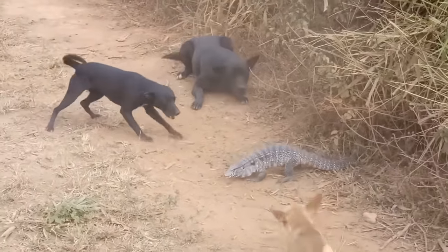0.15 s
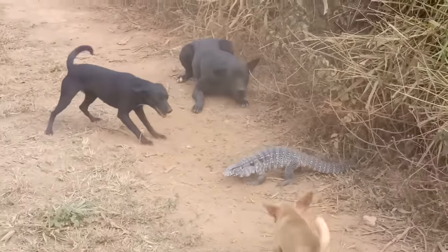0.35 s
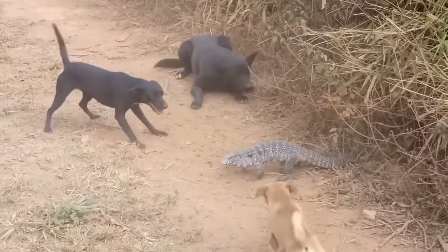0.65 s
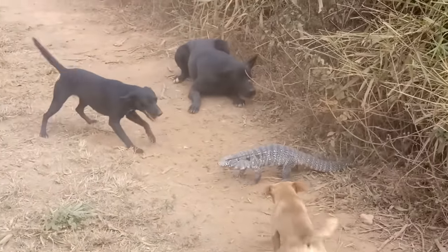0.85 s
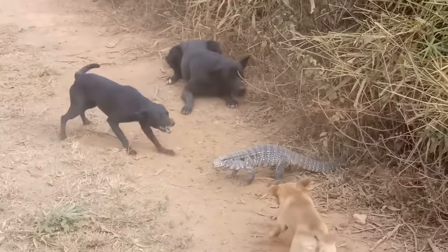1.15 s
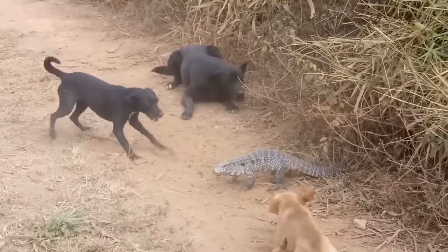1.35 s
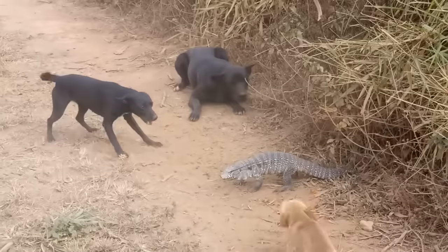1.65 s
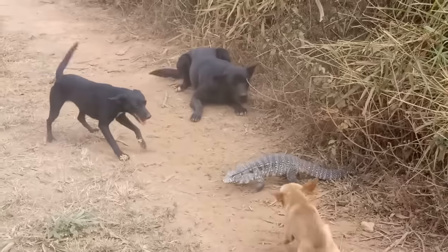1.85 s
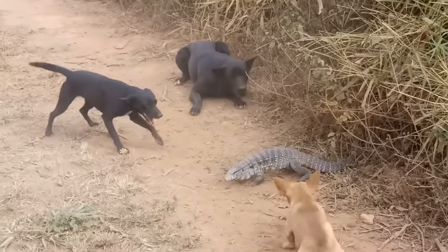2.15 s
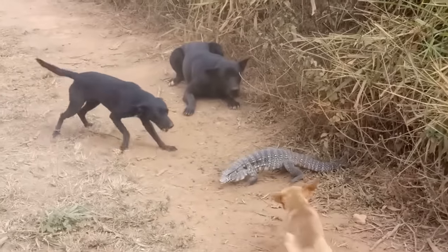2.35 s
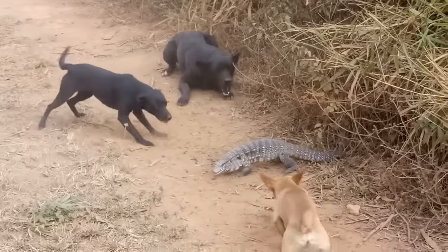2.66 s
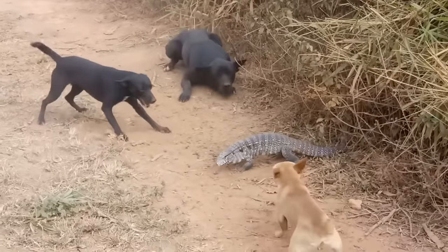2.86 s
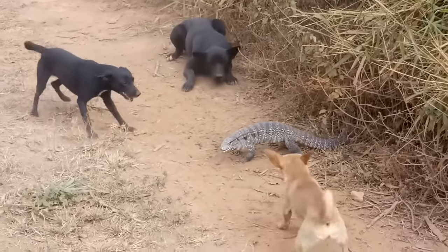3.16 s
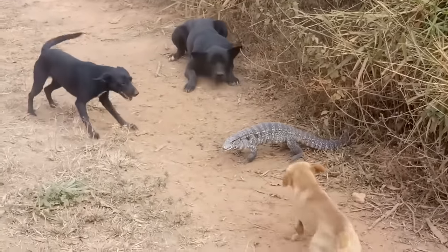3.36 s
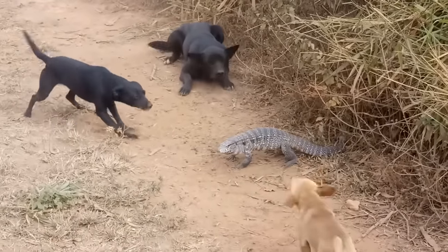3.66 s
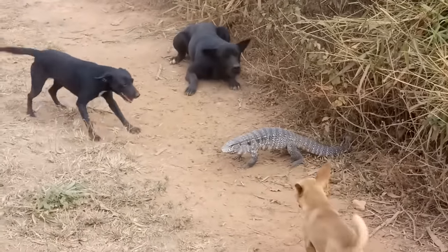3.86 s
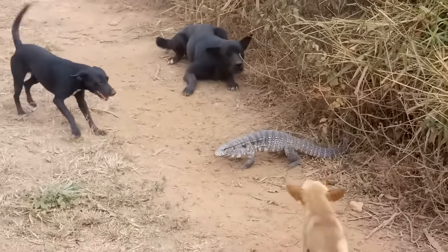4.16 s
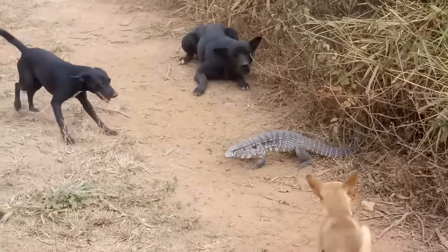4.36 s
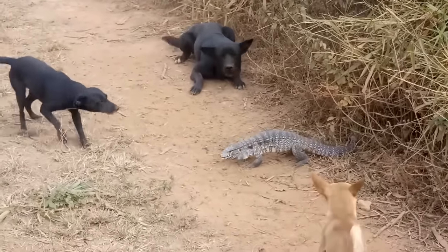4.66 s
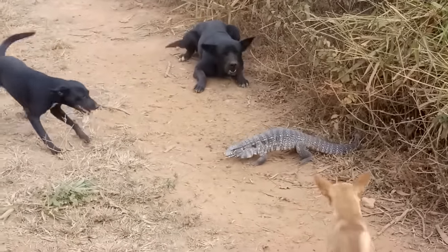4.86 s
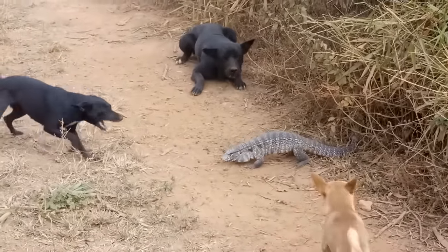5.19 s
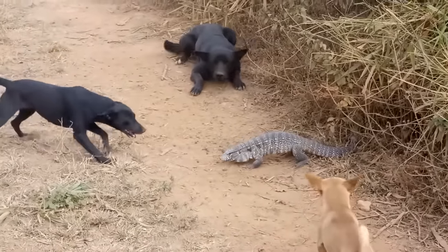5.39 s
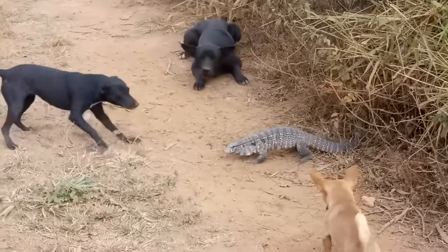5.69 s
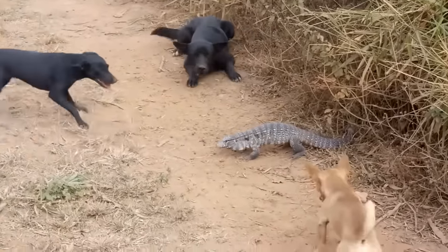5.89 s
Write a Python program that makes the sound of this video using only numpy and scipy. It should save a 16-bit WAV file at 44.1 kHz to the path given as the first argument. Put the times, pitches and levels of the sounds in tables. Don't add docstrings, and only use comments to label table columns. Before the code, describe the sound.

Outdoors on a dry track, a pack of small dogs barks close to a phone for about six seconds, starting at full excitement. Shrill yaps, each a tenth or two of a second, scoop upward and fall sharply, overlapping a mellower dog and hoarse, raspy barks several times a second. Piercing yaps stand out near 0.6, 1.7, 4.5 and 5.8 s; lower barks come around 1.2, 2.3, 4.1, 4.7 and 5.7 s. Low wind buffets lightly at 1.5 and 2 s. A moan climbs from 2.5 to 2.8 s, a short whine swells at 3 s, and a clearer whine rises and falls from 5.1 to 5.5 s. Tiny clicks follow, then low handling thumps at 5.9-6 s. Faint grass rustle and a short brushy echo sit behind, dipping under loud yaps.

```python
import sys
import numpy as np
from scipy import signal
from scipy.fft import rfft, irfft, next_fast_len
from scipy.io import wavfile
from scipy.ndimage import uniform_filter1d, minimum_filter1d, map_coordinates

SR = 44100
rng = np.random.default_rng(int(sys.argv[2]) if len(sys.argv) > 2 else 0)


def log_audio(samples):
    frames = np.atleast_2d(samples).T
    limited = np.clip(frames, -1, 1)
    pcm = np.round(limited * 32767).astype(np.int16)
    wavfile.write(sys.argv[1], SR, pcm)


def invert_db(x):
    u = np.asarray(x, float) / 20
    return 10 ** u


N = 265923

# (start [s], end [s], level [dB], mouth resonance [Hz])
HOARSE_BARKS = [(0.067, 0.151, -15, 1072), (0.237, 0.3, -20.5, 1418), (0.46, 0.595, -34, 673),
                (0.729, 0.83, -25, 836), (0.884, 0.953, -21.5, 1913), (1.11, 1.171, -14, 1380),
                (1.232, 1.309, -18.5, 1245), (1.301, 1.368, -22.5, 999), (1.456, 1.509, -21.5, 1779),
                (1.589, 1.731, -19, 1413), (1.879, 1.945, -21, 1400), (2.066, 2.112, -19.5, 1958),
                (2.218, 2.351, -19.5, 1430), (2.61, 2.731, -13.5, 1271), (2.736, 2.806, -19.5, 1917),
                (2.954, 3.038, -24, 1522), (3.095, 3.119, -13, 1216), (3.291, 3.355, -15.5, 1650),
                (3.433, 3.534, -28.5, 824), (3.654, 3.749, -13.5, 1602), (3.83, 3.869, -20, 1914),
                (4.029, 4.144, -18.5, 1587), (4.208, 4.271, -16, 1893), (4.384, 4.416, -18, 1985),
                (4.649, 4.754, -19, 1404), (4.91, 4.957, -15, 1982), (4.982, 5.065, -19.5, 2130),
                (5.263, 5.356, -15, 1697), (5.447, 5.486, -20, 1783), (5.655, 5.769, -18, 1390)]


def unit(x):
    return x / np.sqrt(np.mean(x ** 2) + 1e-20)


def along(points, hz):
    f, v = np.transpose(points)
    return np.interp(np.log(hz + 1), np.log(f + 1), v)


def wobble(n, rate):
    knots = rng.standard_normal(int(n * rate / SR) + 4)
    return map_coordinates(knots, [np.arange(n) * rate / SR])


def filtered(x, response):
    m = next_fast_len(len(x) + 4096)
    return irfft(rfft(x, m) * response(np.fft.rfftfreq(m, 1 / SR)), m)[:len(x)]


def smooth(x, seconds):
    return uniform_filter1d(x, max(1, int(seconds * SR)), mode="nearest")


def fade(n, seconds):
    k = np.arange(n)
    return np.clip(np.minimum(k, n - k) / (seconds * SR), 0, 1)


def patchy(x, depth_db):
    z = signal.stft(x, nperseg=256)[2]
    field = uniform_filter1d(rng.standard_normal(z.shape), size=3, axis=0)
    field = uniform_filter1d(field, size=5, axis=1)
    return signal.istft(z * invert_db(depth_db * unit(field)), nperseg=256)[1][:N]


def arch(top_s, rise_s, fall_s, top_hz, db, scoop, drop, bend):
    scoop_bend, climb = 3, .15
    swell_db, swell_bend = 14.5, 2.44
    shut_db, shut_bend = 34, 2.09
    s = np.linspace(max(top_s - rise_s, 0), top_s + fall_s, num=32)
    up = np.clip((top_s - s) / rise_s, 0, 1)
    down = np.clip((s - top_s) / fall_s, 0, 1)
    octaves = scoop * (climb * up + (1 - climb) * up ** scoop_bend) + drop * down ** bend
    level_db = db - swell_db * scoop * up ** swell_bend - shut_db * down ** shut_bend
    return np.transpose([s, top_hz / 2 ** octaves, level_db])


def calls():
    # (top [s], rise [s], fall [s], top pitch [Hz], level [dB])
    shrill = [(0.02, .06, 0.055, 2126, -9), (0.415, 0.099, .045, 1815, -9), (0.99, .085, 0.063, 1829, -9.5),
              (1.554, .09, 0.036, 1796, -9.5), (2.722, 0.069, 0.014, 2176, -15),
              (3.39, 0.092, .03, 1912, -10.5), (4.275, .065, 0.059, 1715, -10),
              (5.545, .09, 0.046, 1850, -8.5)]
    jumped = [(1.157, .03, .075, 1530, -9.5), (2.14, 0.03, 0.014, 2221, -9),
              (2.16, .012, 0.041, 1761, -11.5), (2.27, .024, .04, 2128, -9), (2.3, .03, 0.065, 1478, -13),
              (2.755, .028, .045, 1817, -8), (2.849, .012, .055, 1502, -12), (3.04, .022, .045, 2129, -10),
              (3.375, .02, .07, 1571, -20.5), (3.735, .015, .07, 1550, -13.5), (3.91, .015, .115, 1611, -9),
              (4.15, .01, .03, 2093, -19.5), (5.055, 0.027, .07, 1769, -9), (2.83, .035, .015, 1390, -12),
              (1.234, .02, .05, 1500, -13.5), (.075, .02, 0.046, 1143, -13), (1.22, .035, 0.046, 2300, -19)]
    cracked = [(0.296, .06, .09, 1655, -11.5), (0.65, .065, 0.062, 1552, -10.5),
               (1.741, .04, .055, 1590, -14), (3.074, .13, .045, 1542, -11), (4.475, .095, .02, 1845, -9.5),
               (5.015, .1, .02, 1749, -9), (5.805, .1, .02, 1513, -11.5)]
    mellow = [(0.866, 0.077, 0.083, 1461, -10.5), (1.405, .085, 0.095, 1369, -9.5),
              (1.625, 0.045, 0.021, 1287, -14), (1.832, 0.074, 0.033, 1423, -9.5),
              (1.961, .085, 0.086, 1380, -10.5), (2.104, 0.048, 0.016, 1297, -20.5),
              (2.525, .1, .06, 1369, -10.5), (2.766, 0.057, 0.048, 1340, -11.5),
              (4.14, .025, .02, 1326, -20.5)]
    broken = [(0.042, 0.051, .035, 1412, -15), (2.372, .02, 0.013, 1500, -15),
              (2.42, 0.053, .03, 1450, -11), (.35, .03, .015, 1380, -17), (5.485, .035, 0.016, 1320, -13.5),
              (3.522, 0.023, 0.026, 1320, -16.5), (3.59, .08, 0.054, 1445, -13.5),
              (3.885, 0.066, 0.018, 1350, -13)]
    barks = [(0.09, 0.046, .065, 553, -19.5), (1.24, .06, .055, 774.4, -16),
             (2.285, 0.035, 0.087, 722.4, -17.5), (3.685, 0.062, .025, 785, -24),
             (4.105, .09, .03, 694.6, -14), (4.69, 0.079, .06, 790, -15), (5.7, 0.08, 0.067, 772, -15.5)]
    piercing = [(0.63, .085, .045, 2170, -11.5), (1.675, .075, .04, 2070, -10),
                (4.54, .075, .05, 2120, -11), (5.83, .065, .075, 2235, -14), (2.232, .04, .025, 1695, -13)]
    # (half-pitch partials [dB], brightness [dB per octave],
    # scoop [octaves], drop [octaves], bend of the drop [exponent])
    voices = [
        (-50, 4.5, 1.1, 1, 3.2),
        (-42.5, 4, .08, .9, 2.2),
        (-11.5, 6, 1.2, 0.99, 2.9),
        (-37.5, 1.5, 1.1, 1.7, 3.2),
        (-3.5, 3.5, .6, .6, 3.2),
        (-31, 4.5, .4, .4, 2.5),
        (-31, 9.5, 1.2, 1, 3.2),
    ]
    # (time [s], pitch [Hz], level [dB])
    whines = [
        [(1.58, 318, -31.5), (1.62, 413, -44.5), (1.68, 309.7, -42.5), (1.72, 231, -43.5), (1.77, 362, -44.5)],
        [(2.43, 192.6, -59.5), (2.47, 309.7, -30), (2.5, 356.5, -40.5), (2.6, 330.3, -31.5), (2.65, 372, -24),
         (2.7, 451, -26), (2.76, 634, -27.5), (2.795, 635, -22), (2.84, 379, -23.5)],
        [(2.84, 396.3, -39), (2.9, 393, -24.5), (2.94, 420.5, -19.5), (2.97, 611.4, -10.5), (2.995, 617, -13.5),
         (3.01, 552, -27)],
        [(3.0, 312.5, -32), (3.03, 258.3, -32.5), (3.1, 182.8, -36.5), (3.17, 158.5, -43.5)],
        [(4.862, 1136, -43), (4.88, 690.7, -31.5), (4.905, 554.5, -23.5), (4.96, 679, -29), (5.02, 595, -32.5),
         (5.05, 456, -58), (5.1, 491, -32)],
        [(5.12, 696, -29.5), (5.17, 825, -14.5), (5.225, 978, -11), (5.27, 1062, -9), (5.315, 1219, -18),
         (5.355, 983, -17), (5.42, 829, -16.5), (5.46, 720, -24.5), (5.51, 586, -36)],
    ]
    # (time [s], pitch [Hz], level [dB])
    growl = [(5.128, 227.6, -36.5), (5.2, 201, -43.5), (5.289, 223, -48.5)]
    # (half-pitch partials [dB], brightness [dB per octave])
    whine_voices = [(-20.5, -7), (-23, 4.5), (-32, -9), (-44, 2.5), (-63, -2), (-32.5, 1.5), (-45, -9.5)]
    pack = []
    for rows, voice in zip([shrill, jumped, cracked, mellow, broken, barks, piercing], voices):
        half_db, bright_db, *shape = voice
        pack += [(arch(*row, *shape), half_db, bright_db) for row in rows]
    return pack + [(rows, *voice) for rows, voice in zip(whines + [growl], whine_voices)]


def yaps():
    # (frequency [Hz], gain [dB])
    throat = [(150, -64), (500, -2.5), (900, -0.5), (1600, 11), (2500, -6), (4200, -18.5), (6000, -29.5),
              (7500, -38), (12000, -57)]
    out = np.zeros(N + SR)
    hoarse = np.zeros(N + SR)
    for start_s, end_s, *_ in HOARSE_BARKS:
        hoarse[round(start_s * SR):round(end_s * SR)] = 1
    for rows, half_db, bright_db in calls():
        s, hz, db = np.transpose(rows)
        t = np.arange(s[0], s[-1], 1 / SR)
        start, n = round(s[0] * SR), len(t)
        closed = np.median(hz) < 450
        glide = smooth(np.interp(t, s, hz), .01)
        climb = np.gradient(np.log(glide), t)
        rough = hoarse[start:start + n] * (0 if closed else .45)
        rough = rough + (not closed) * np.clip(climb / 14 - .3, 0, .55)
        pitch = glide * (1 + (.004 + .022 * rough) * wobble(n, 250) + .012 * wobble(n, 45))
        level = smooth(np.interp(t, s, invert_db(db)), .006) * invert_db((.5 + 3 * rough) * wobble(n, 200))

        order = np.arange(1, int(2 * 15000 / hz.max()))[:24, None] / 2
        age, coarse = t[::32] - s[0], pitch[::32]
        partial_hz = order * coarse
        uneven_db = np.array([wobble(len(age), 32 * 55) for _ in order]) * (order > 1)
        uneven_db = (6.5 if n < .2 * SR else 4) * uneven_db
        drop = smooth(np.clip(-np.gradient(np.log(coarse), age), 0, 30), 0.0003)
        tilt_db = (bright_db - 3 * age / age[-1] - .5 * drop) * np.log2(order) - 12 * (order < 1)
        throat_db = along(throat, partial_hz * (2.2 if closed else 1))
        gain = invert_db(throat_db + tilt_db + uneven_db) * (partial_hz < 15500)
        onset = invert_db(-7.0 - 60 * age / 0.023)
        steep = invert_db(-4.5) * (not closed) * np.clip(climb[::32] / 14 - .45, 0, 1)
        gain *= np.where(order % 1, invert_db(half_db) + onset + steep, 1)
        gain /= np.linalg.norm(gain, axis=0)
        smear = np.clip((partial_hz - 4000) / 9000, 0, .45)
        smear = np.clip(smear + .3 * rough[::32], 0, .9)
        flutter = np.array([wobble(len(age), 32 * 450) for _ in order]) * (order > .5)
        gain *= np.sqrt(1 - smear ** 2) + smear * flutter
        gain = uniform_filter1d(np.repeat(gain, 32, axis=1), size=48, axis=1)[:, :n]

        phase = 2 * np.pi * (np.cumsum(pitch) / SR * order + rng.random(order.shape))
        voice = np.sum(gain * np.sin(phase), axis=0)
        out[start:start + n] += np.sqrt(2) * level * fade(n, .008) * voice
    return out[:N]


def wind():
    # (time [s], level [dB])
    buffet = [(0.0, -68), (0.54, -51.5), (0.6, -61), (1.0, -67), (1.45, -61), (1.52, -40), (1.6, -62.5),
              (1.85, -61), (1.95, -48), (2.01, -39.5), (2.101, -50), (2.22, -45.5), (2.3, -56.5),
              (3.38, -60), (3.55, -53.5), (4.4, -65.5), (5.839, -74.5), (5.909, -42.5), (6.03, -34.5)]
    # (frequency [Hz], density [dB per Hz])
    rumble_shape = [(25, -13.5), (90, -4), (200, -5.5), (400, -21.5), (800, -91.5)]
    # (time [s], peak level [dB], frequency [Hz])
    thumps = [
        (5.919, -30, 110),
        (5.936, -22, 109.6),
        (5.989, -24, 106),
        (6.013, -15, 107),
    ]
    # (time [s], peak level [dB], frequency [Hz])
    ticks = [
        (3.279, -29, 516),
        (5.495, -37, 7030),
        (5.639, -25, 7200),
    ]
    t = np.arange(N) / SR
    s, db = np.transpose(buffet)
    rumble = filtered(rng.standard_normal(N), lambda hz: invert_db(along(rumble_shape, hz)))
    lumps_db = 1.4 * wobble(N, 24) + 6 * wobble(N, 4.98)
    out = invert_db(np.interp(t, s, db)) * unit(rumble * invert_db(lumps_db))
    for hit_s, peak_db, hz in thumps + ticks:
        u = (t - hit_s) * hz * 2 * np.pi
        out += invert_db(peak_db) * (1 - u * u) * np.exp(-u * u / 2)
    return out


def air():
    # (frequency [Hz], density [dB per Hz])
    rustle_shape = [(100, -17.5), (900, -14.5), (1500, -19.5), (4300, -24.5), (8300, -31), (11000, -44),
                    (14000, -60)]
    rustle = filtered(rng.standard_normal(N), lambda hz: invert_db(along(rustle_shape, hz)))
    return invert_db(-44 + 0.34 * wobble(N, 9.3)) * unit(rustle)


def brush(x):
    # (frequency [Hz], time to fall 60 dB [s])
    decay = [(500, 0.51), (2000, 0.37), (8000, 0.6), (11000, 0.2)]
    hz, t, z = signal.stft(rng.standard_normal(SR), SR, nperseg=256)
    tail = signal.istft(z * invert_db(-60 * t / along(decay, hz)[:, None]), SR, nperseg=256)[1]
    delayed = np.pad(x, (700, 0))
    return signal.fftconvolve(delayed, tail / np.linalg.norm(tail))[:N]


def rasps():
    # (frequency [Hz], width [Hz], level [dB])
    upper = [(2600, 600, -12), (4400, 900, -20), (7300, 1200, -26)]

    def ring(f, center, width):
        return 1j * f * width / (center * center - f * f + 1j * f * width)

    out = np.zeros(N)
    for start_s, end_s, db, mouth_hz in HOARSE_BARKS:
        def tract(f):
            mouth = ring(f, mouth_hz, 0.85 * mouth_hz) ** 2
            bright = sum(invert_db(g) * ring(f, c, w) ** 2 for c, w, g in upper)
            return (mouth + bright) / (1 + (f / 9000) ** 6)

        n = round((end_s - start_s) * SR)
        rate_db = .55 * wobble(n, 150) + wobble(n, 25) + 2.5 * np.sin(np.pi * np.arange(n) / n) - 1.5
        cycles = np.cumsum(.45 * mouth_hz * invert_db(rate_db)) / SR
        slaps = np.diff(np.floor(cycles), prepend=0) * invert_db(3 * wobble(n, 600))
        breath = rng.standard_normal(n) * (1 - cycles % 1)
        bark = unit(filtered(0.63 * unit(slaps) + 0.46 * unit(breath), tract))
        level = invert_db(db + 2.5 * wobble(n, 60)) * fade(n, .024) ** 1.3
        out[round(start_s * SR):][:n] += level * bark
    return patchy(out, depth_db=4)


def scene():
    clear, hoarse = yaps(), rasps()
    duck = 1 / (1 + smooth(np.abs(clear), 0.011) / invert_db(-16.0))
    dogs = clear + hoarse
    background = duck * (invert_db(-12.0) * brush(dogs) + duck * air())
    return (dogs + background + duck ** 1.3 * invert_db(7.5) * wind())[None]


def band_limit(x):
    return signal.sosfilt(signal.butter(12, 15800, fs=SR, output="sos"), x)


def record(dry):
    envelope = np.abs(signal.hilbert(dry[0], next_fast_len(N))[:N])
    need = np.minimum(1, .62 / (envelope + 1e-9)) ** .6
    x = dry[0] * smooth(minimum_filter1d(need, size=200), 0.004)
    # (frequency [Hz], gain [dB])
    response = [(2200, 0), (3100, -4.5), (4300, 1.5), (5000, -0.5), (6100, -11), (7200, 5.0),
                (8350, -3.5), (8750, -13), (13000, -3)]
    x = filtered(x, lambda hz: invert_db(along(response, hz)))
    x = x / (1 + np.abs(x / .92) ** 6) ** (1 / 6)
    return band_limit(x[None])


dry = scene()
out = record(dry)
log_audio(out)
```